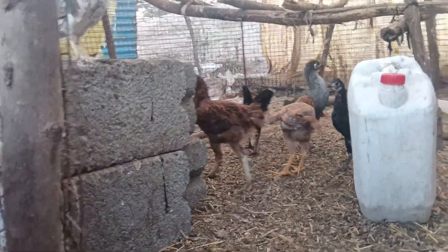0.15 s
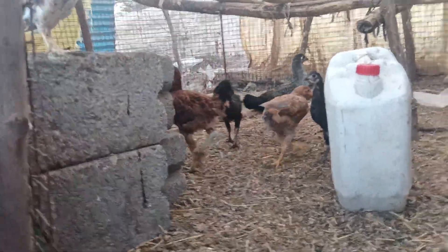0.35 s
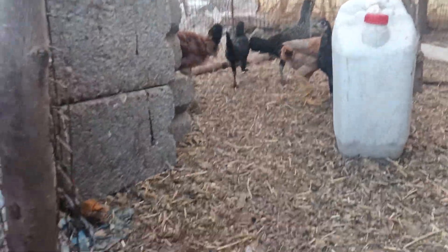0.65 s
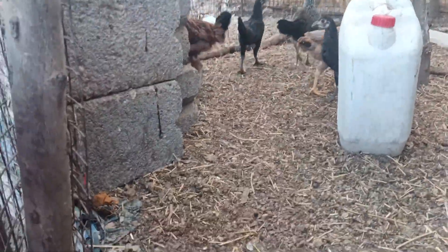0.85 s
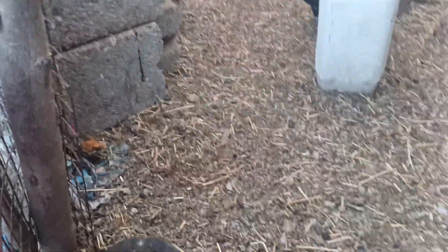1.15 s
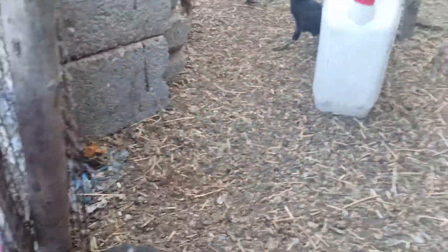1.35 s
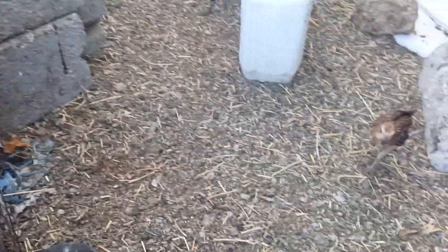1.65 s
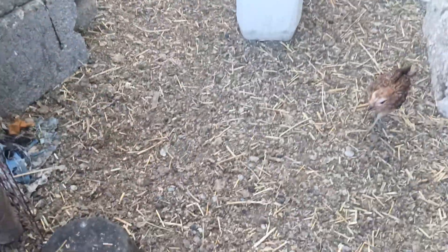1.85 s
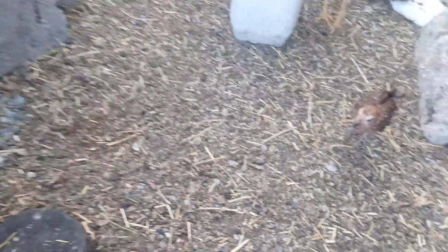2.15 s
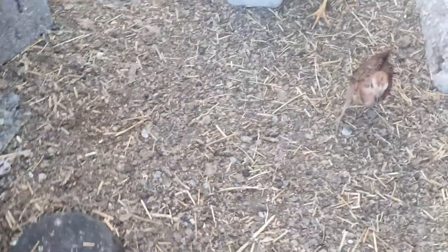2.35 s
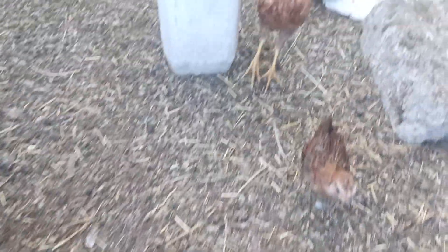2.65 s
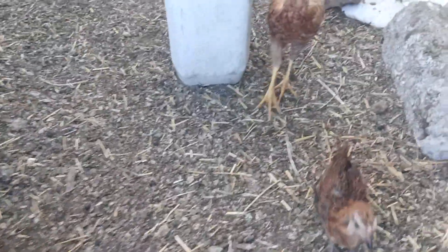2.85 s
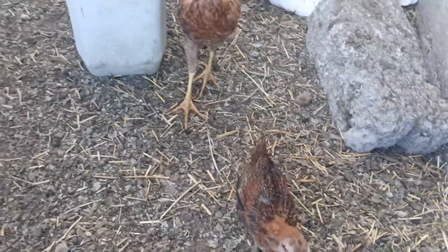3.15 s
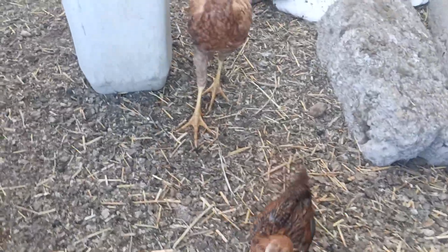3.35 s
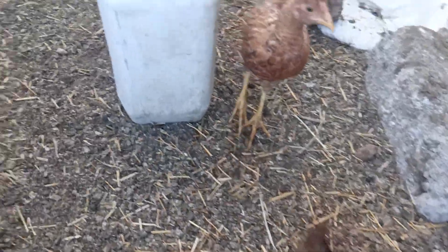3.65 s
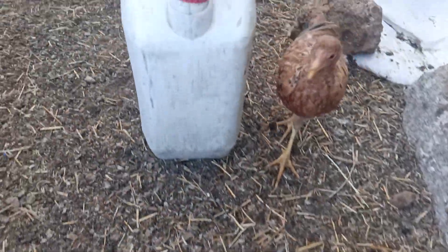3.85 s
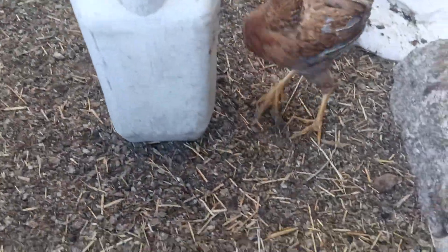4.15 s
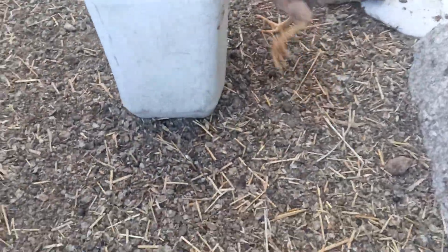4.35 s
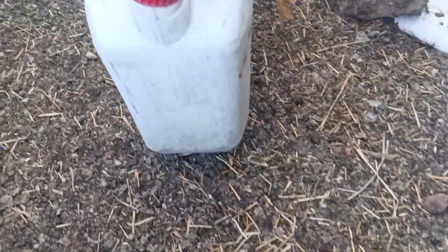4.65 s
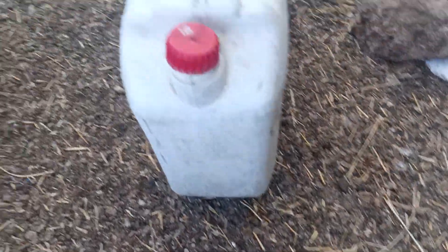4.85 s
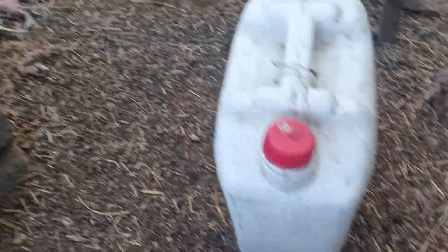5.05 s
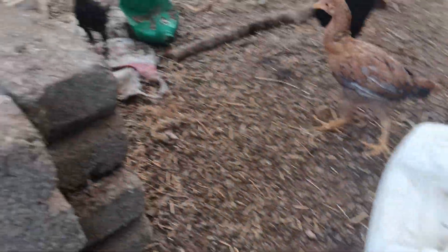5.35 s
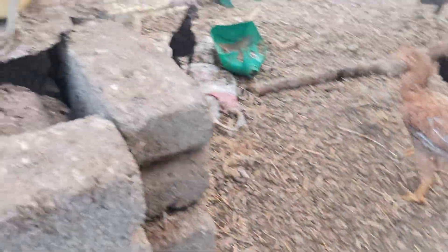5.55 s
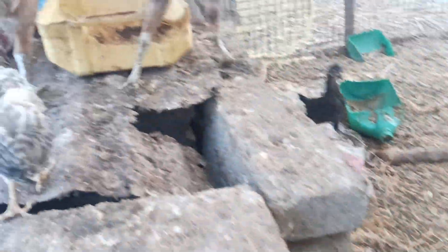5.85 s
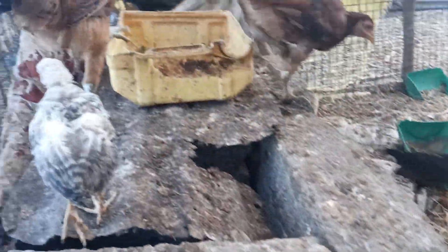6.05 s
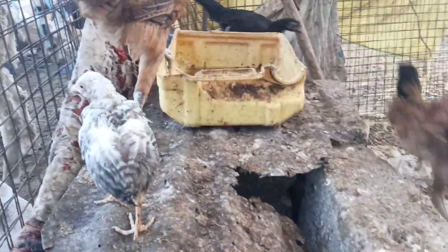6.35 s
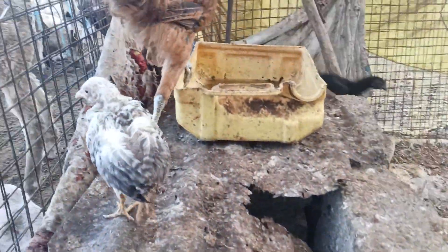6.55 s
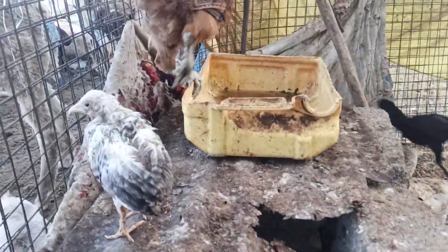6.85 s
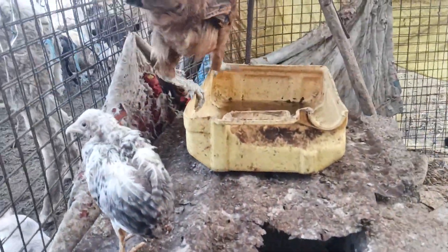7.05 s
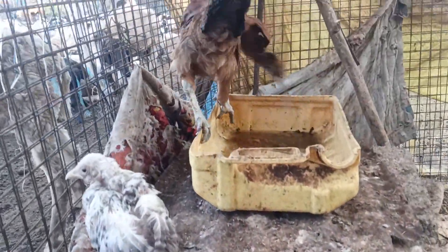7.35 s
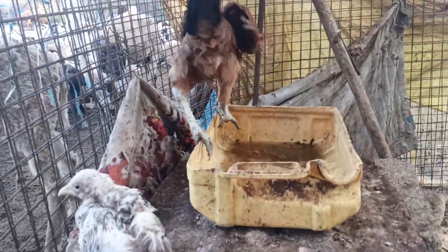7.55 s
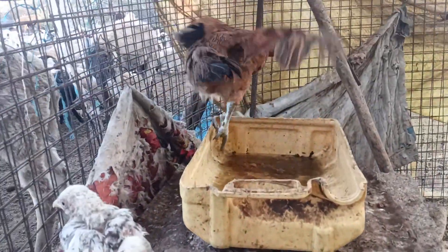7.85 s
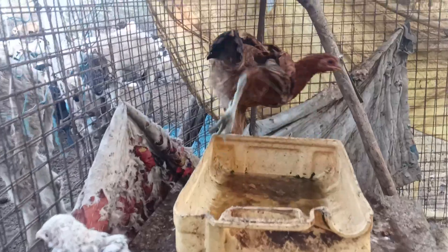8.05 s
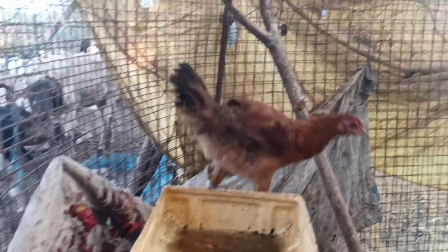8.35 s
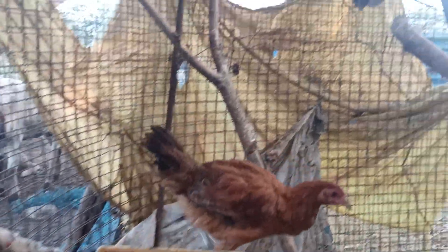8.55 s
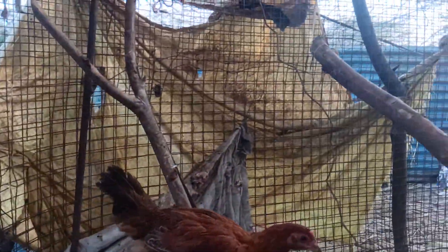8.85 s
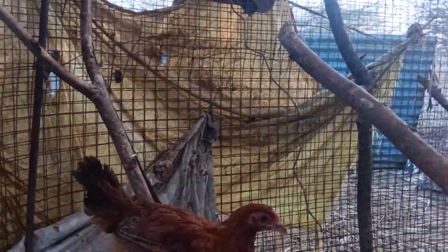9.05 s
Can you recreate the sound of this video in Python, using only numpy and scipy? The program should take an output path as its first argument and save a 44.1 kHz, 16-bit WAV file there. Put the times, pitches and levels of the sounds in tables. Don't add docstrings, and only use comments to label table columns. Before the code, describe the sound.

Chicks peep over quiet straw rustle in a coop; a lamb bleats close by, a ewe answers fainter, hens cluck and scuffle among knocks.

```python
import sys
import numpy as np
from scipy import signal
from scipy.fft import rfft, irfft, next_fast_len
from scipy.io import wavfile
from scipy.ndimage import uniform_filter1d, map_coordinates

SR = 44100
rng = np.random.default_rng(int(sys.argv[2]) if len(sys.argv) > 2 else 0)


def level_to_linear(level):
    exponent = np.asarray(level, float) / 20
    return 10 ** exponent


def wav_out(sig):
    wavfile.write(sys.argv[1], SR, np.round(np.clip(np.atleast_2d(sig).T, -1, 1) * 32767).astype(np.int16))


N = 405719
STEP = 32
CHIRP_HZ = 3550
FAR_EVERY_S = 0.393

# freq_hz, level_db
GROUND = [(18, -63.5), (30, -14), (103, 1), (166, -7), (240, -15), (400, -10), (520, -36), (880, -120)]
# freq_hz, level_db
SHUFFLE = [(120, -34.5), (200, -5), (577, -4), (660, 1.5), (2000, -22), (2600, -43), (4400, -120)]
# freq_hz, level_db
STRAW = [(710, -25), (1200, 1), (1860, 2), (2700, 5.5), (4380, -8), (5960, -10.5), (7500, -21.5),
         (9750, -49.5), (16500, -120)]
# freq_hz, level_db
CRACKLE = [(3240, -34.5), (5500, -1), (6630, 5.5), (7770, -8), (10400, -8.5), (11100, -2.5), (13600, -14),
           (15200, 6), (16300, -13), (16800, -47)]
# time_s, level_db
FLOCK = [(0, -76), (.47, -68), (1, -69), (1.2, -79), (1.5, -68), (1.65, -77), (2.1, -78), (2.2, -69),
         (2.5, -78), (2.75, -56), (3.74, -64.5), (4.4, -69), (5.2, -66), (5.85, -64), (6.03, -83),
         (8.9, -79), (9.2, -74)]
# peak_s, shuffle_db, straw_over_shuffle_db, rise_s, fall_s (both for 20 dB)
SCUFFLES = [
    (.61, -57, -4, .3, .14),
    (4.77, -42, -12, .16, .12),
    (4.98, -57, -2, .3, .07),
    (5.33, -48, -7, .06, .25),
    (5.8, -60, -8, 2, .25),
    (6.1, -72, 8, .07, .2),
    (6.35, -70, 2, .2, .06),
    (7, -70, 5, .2, .2),
    (8.05, -59.5, -12, .13, .2),
    (9.2, -67, -7, .5, .1),
]

# start_s, length_s, level_db
CHIRPS = [(0.05, 0.054, -56), (0.154, 0.031, -52.5), (0.297, 0.04, -55.5), (0.617, 0.065, -59.5),
          (0.754, 0.017, -52), (1.075, 0.044, -54.5), (1.489, 0.08, -66), (1.662, 0.045, -56.5),
          (1.806, 0.037, -56), (2.254, 0.049, -60.5), (2.419, 0.032, -56), (2.626, 0.058, -45),
          (3.815, 0.043, -58), (4.322, 0.041, -64.5), (4.86, 0.035, -57), (5.054, 0.031, -58.5),
          (5.215, .05, -65), (5.902, 0.03, -51), (6.08, 0.047, -61.5), (6.904, .13, -66)]
# start_s, length_s, pitch_hz, level_db
NOTES = [(0.486, 0.049, 2100, -59), (0.881, 0.027, 3600, -52.5), (0.916, 0.018, 2650, -55),
         (0.956, 0.012, 2355, -50.5), (0.966, 0.021, 1530, -58.5), (1.12, 0.024, 2940, -50),
         (1.563, 0.032, 1735, -63.5), (1.587, 0.014, 1277, -61), (1.745, .03, 2680, -62),
         (4.675, .035, 3000, -56), (3.988, 0.012, 3170, -42), (4.277, 0.017, 1276, -37),
         (4.922, 0.019, 1555, -46), (5.005, 0.022, 2960, -56.5), (5.377, 0.042, 3040, -42),
         (6.129, 0.019, 1490, -47), (6.303, 0.022, 2950, -61.5), (7.002, 0.035, 1170, -54.5),
         (7.847, 0.042, 2805, -64), (8.157, 0.064, 2500, -63), (9.158, 0.03, 3050, -57),
         (.143, .012, 3150, -58), (6.665, .015, 5350, -66), (8.012, .015, 5550, -66), (0, .04, 3250, -63),
           (.19, .03, 1300, -65), (.53, .02, 2300, -62), (1.085, .02, 2150, -61), (1.14, .04, 1450, -66),
           (1.418, .015, 2950, -57), (1.46, .02, 1800, -67), (1.53, .015, 2100, -64),
           (2.67, .03, 1600, -57), (3.98, .03, 1600, -63), (3.995, .025, 2550, -56),
           (4.235, .03, 2800, -55), (4.263, .025, 1800, -59), (4.272, .03, 2480, -54),
           (4.86, .03, 2550, -59), (4.91, .03, 2600, -60), (4.942, .012, 2150, -53),
           (5.385, .03, 3500, -52), (5.4, .015, 2550, -55), (5.437, .015, 2150, -55), (6.1, .03, 2400, -61),
           (7.53, .03, 2750, -70), (7.945, .03, 2350, -69), (8.165, .05, 3150, -71),
           (8.245, .04, 2050, -72), (8.54, .04, 2100, -68), (8.6, .03, 2750, -74), (8.795, .025, 2950, -71),
           (8.868, .045, 2050, -71), (8.993, .045, 1190, -55), (9.185, .012, 2450, -61)]
# start_s, length_s, start_hz, level_db
GLIDES = [(0.415, 0.1, 6200, -67), (1.355, .03, 2950, -61), (4.2, 0.04, 3450, -55), (4.198, .03, 2600, -52),
          (5.69, .04, 4050, -60), (5.74, .04, 3500, -57), (7.303, .03, 2850, -66), (7.33, .06, 3950, -71),
          (6.392, 0.08, 3900, -64), (6.68, 0.05, 5000, -60), (7.15, 0.112, 6350, -64),
          (8.015, 0.135, 5300, -61)]
# start_s, length_s, start_hz, end_hz, level_db
SHRIEK = (4.165, 0.024, 4500, 3650, -28)
# start_s, calls, level_db
FAR_PEEPS = [
    (.704, 5, -73.5),
    (.904, 1, -64.5),
    (3.84, 1, -68),
    (6.196, 8, -79),
]
# start_s, calls, level_db
HOOKS = [
    (.2, 5, -72),
    (6.1, 5, -76),
]

# start_s, length_s, pitch_hz, level_db, beak_opening_db
CLUCKS = [(1.875, .014, 590, -53, -6), (1.89, 0.036, 391.4, -55, -4), (1.983, .02, 745, -56, 3),
          (2.002, 0.043, 405, -51, -2.5), (3.998, 0.058, 361.6, -48, -8.5), (6.156, 0.05, 461, -58.5, -16),
          (7.143, 0.024, 347.6, -50.5, -22), (7.588, 0.071, 423.5, -48, -8),
          (8.399, 0.04, 340.4, -53.5, -17), (8.657, 0.021, 353.2, -51, -11), (8.74, 0.024, 415.7, -39, -4),
          (8.958, 0.035, 435, -55.5, -4.5), (9.088, 0.022, 418, -35, 1), (8.795, .03, 430, -58, -20),
          (9.11, .025, 410, -52, -6)]
# start_s, length_s, pitch_hz, level_db,
# beak_opening_db
GRUNTS = [(0.45, 0.13, 374, -57, 0.5), (0.167, 0.039, 435.7, -55.5, -3), (2.744, 0.05, 235.1, -46, -3),
          (5.897, 0.052, 235.3, -48, -3), (6.565, 0.05, 700, -60, -20), (7.046, 0.04, 365, -53.5, -28),
          (7.244, 0.035, 381.4, -49, -27), (7.435, 0.079, 385.5, -60, -20), (8, 0.04, 384.7, -49, -6),
          (8.118, 0.04, 402.2, -51, -3), (7.962, .035, 390, -57, -6), (8.765, .05, 400, -51, -5),
          (9.055, .035, 400, -50, -3)]
# freq_hz, width_hz, level_db
HEN_CHEST = [(414.6, 170, -1.5), (773, 178, 0)]
# freq_hz, width_hz, level_db
HEN_BEAK = [(1198, 350, -1), (1750, 570, -3), (2680, 290, -9.5), (4800, 2300, -25.5)]
# start_s, peak_db, ring_hz, snap_db
STAMPS = [(0.168, -61.5, 172, -11), (0.608, -50.5, 112, 5), (0.668, -45, 76.4, 4.5), (1.37, -60, 150, -30),
          (2.742, -45, 235, -3), (4.262, -52.5, 147, -39), (4.767, -38.5, 120, -14),
          (5.326, -38.5, 95, -31), (5.905, -55.5, 232.7, -22), (7.247, -51, 232, -11),
          (7.571, -42.5, 148.9, -8.5), (7.758, -47.5, 124, -17.5), (8.081, -42, 130, 6),
          (8.225, -59, 258.3, 23.5), (8.713, -40, 127, -2.5), (9.044, -44, 127, -7), (9.074, -47, 140, -12),
          (8.74, -48, 140, -20), (9.141, -47.5, 168, 0), (9.158, -48.5, 150, 0), (4.32, -58, 150, -30),
          (4.783, -44, 130, -5)]

# start_s, peak_db, body_db
TICKS = [(0.6069, -57, 12), (0.669, -60, 23), (1.66, -60, 5), (2.5172, -61.5, 16.5), (2.7, -56, 0),
         (2.886, -52, 0), (2.6513, -49.5, 3), (2.7478, -38, 3), (2.833, -45.5, 0.5), (3.9144, -31.5, -25),
         (4.4323, -51, 2), (4.724, -32.5, -9.5), (4.7738, -44.5, 10), (4.8369, -41.5, -22),
         (4.8814, -43.5, -1), (4.948, -34, -1.5), (5.0137, -50, -14.5), (5.3037, -26.5, -11.5),
         (5.372, -46, 4), (5.8868, -51.5, 11), (6.552, -52, -4), (6.744, -50.5, -7), (7.4452, -55, 5.5),
         (7.7163, -50, -15.5), (8.3421, -32.5, -6.5), (8.4395, -63.5, 17.5), (8.743, -59.5, 18)]
# freq_hz, level_db, t60_s (not used)
TIN = [(2033, -6.5, 0.11), (3700, -18.5, 0.075), (5520, -16.5, 0.035), (6196, -24, 0.08)]
# start_s, peak_db, ring_hz, t60_s
KNOCKS = [(1.878, -57, 1750, .03), (7.058, -56, 700, .05), (7.148, -51, 650, .04), (2.195, -60, 1250, .06),
          (4.462, -52, 2500, .02), (4.472, -50, 390, .05), (4.565, -54, 1100, .03), (4.738, -42, 700, .04),
          (4.776, -40, 1200, .02), (5.9, -42, 1000, .03), (5.935, -50, 1000, .03), (6.078, -55, 1300, .03),
          (6.093, -53, 1300, .03), (6.265, -58, 900, .06), (6.355, -55, 1300, .03), (7.253, -48, 850, .04),
          (7.443, -48, 650, .03), (7.475, -50, 700, .08), (7.995, -33, 1250, .02), (8.003, -40, 900, .04),
          (8.063, -54, 550, .04), (8.116, -33, 1750, .02), (8.66, -50, 900, .04), (9.048, -52, 650, .03)]
# start_s, peak_db
PINGS = [
    (4.572, -61),
    (4.667, -62),
    (4.745, -58),
    (4.837, -59),
    (4.951, -57),
    (5.303, -52),
    (5.424, -64),
]

# time_s, pitch_hz, effort_db, tongue_raised_db, tongue_hz
LAMB = [
    (2.94, 256, -35, 9, 2680),
    (2.984, 267, -27, 4, 2800),
    (3.045, 268.5, -26.5, 2.5, 2640),
    (3.12, 277, -25.5, 3, 2440),
    (3.268, 279, -25.5, 3.5, 2430),
    (3.3, 271, -27.5, 4, 2430),
    (3.52, 268, -30, -2, 2520),
    (3.69, 258, -41, -1, 2720),
    (3.755, 252, -55, -14, 2780),
]
# time_s, throat_hz, throat_db, cheek_db, brightness_db
LAMB_THROAT = [(2.95, 3100, 8, -16, 0), (3.1, 3300, 6, -18, -3), (3.26, 3200, 4, -16, -9),
               (3.33, 3450, 5, -14, -3), (3.46, 3450, 3, -8, 0), (3.55, 3000, -6, -2, -3),
               (3.7, 3700, 4, -9, 0)]
# freq_hz, width_hz, level_db
LAMB_UPPER = [(4230, 440, -1), (5400, 560, -9), (5900, 300, -28), (8900, 2400, -23), (14800, 2400, -25)]
# time_s, dip_hz
SLIPS = [
    (3.038, 3),
    (3.14, 2.2),
    (3.285, 3),
    (3.352, 6),
    (3.385, -3),
    (3.412, 4),
    (3.46, 3),
    (3.545, 4),
    (3.65, 4),
]
# freq_hz, lead_rad
LAMB_LEAD = [(0, 0), (690, -4.4), (3100, -13.9), (5170, -26.1), (11400, -53.3), (12900, -60.1),
             (14200, -56.3), (16600, -63.9)]

# start_s, every_s, clicks, level_db
PURR = (4.083, .0117, 9, -45)
# freq_hz, level_db, t60_s
PURR_THROAT = [(1020, -2, .017), (1350, -9, .012), (1750, 3, .02), (2400, -3, .01), (4400, -14, .008)]

# time_s, pitch_hz, mouth_db, throat_db
EWE = [
    (5.22, 280.5, -76.5, -89),
    (5.411, 316.2, -58, -55),
    (5.521, 292.6, -50.5, -46.5),
    (5.55, 231.3, -50.5, -48),
    (5.722, 224, -53, -46.5),
    (5.82, 226, -55, -52),
    (5.891, 222, -58, -100),
]
# freq_hz, width_hz, level_db
EWE_THROAT = [(1860, 220, 8), (2900, 400, -3), (3740, 500, -11), (6340, 400, -16)]

# freq_hz, left_minus_right_db
LEAN = [(60, -3), (150, -4), (380, 6), (950, 8), (2380, 0), (5980, 11), (15000, 5.5)]
# freq_hz, t60_s
COOP = [(200, 0.043), (2000, 0.069), (10000, 0.023)]


def unit(x):
    return x / np.sqrt(np.mean(x ** 2) + 1e-20)


def along(points, hz):
    f, v = np.transpose(points)
    return np.interp(np.log(hz + 1), np.log(f + 1), v)


def curves(rows, t):
    s, *cols = np.transpose(rows)
    return [np.interp(t, s, c) for c in cols]


def fine(x):
    part = np.arange(STEP) / STEP
    between = x[..., :-1, None] * (1 - part) + x[..., 1:, None] * part
    return between.reshape(*x.shape[:-1], -1)


def wobble(rate, size=N):
    knots = rng.standard_normal(int(size * rate / SR) + 4)
    return map_coordinates(knots, [np.arange(size) * rate / SR])


def filtered(x, response):
    m = next_fast_len(x.shape[-1] + 8192)
    spectrum = rfft(x, m) * response(np.fft.rfftfreq(m, 1 / SR))
    return irfft(spectrum, m)[..., :x.shape[-1]]


def peak(f, hz, width):
    return 1j * f * width / (hz * hz - f * f + 1j * f * width)


def tract(f, modes):
    return sum((-1) ** k * level_to_linear(db) * peak(f, hz, w) for k, (hz, w, db) in enumerate(modes))


def add(track, s, x):
    part = track[max(round(s * SR), 0):][:len(x)]
    part += x[:len(part)]


def voice(pitch, rough, throat, flutter_hz=220, clear_hz=2500, fray=1.5):
    size = len(pitch)
    k = np.arange(1, int(16500 / pitch.max()) + 1)[:, None]
    jitter = 1 + 0.033 * rough * wobble(70 * STEP, size=size)
    phase = 2 * np.pi * np.cumsum(fine(pitch * jitter)) / SR

    def slow(hz):
        noise = rng.standard_normal((len(k), size))
        return signal.resample(noise[:, :int(size * STEP * hz / SR) + 3], size, axis=1)

    flutter = slow(flutter_hz) + 1j * slow(flutter_hz)
    drift = level_to_linear(np.clip(k * pitch.mean() / 2200, 0, 2.5) * slow(18))
    rough = np.clip(rough * np.minimum(k * pitch / clear_hz, fray), 0, 1)
    overtones = throat(k * pitch) * drift * (1 - rough + rough * flutter)
    return np.real(np.sum(fine(overtones) * np.exp(1j * k * phase), 0))


def stir():
    t = np.arange(N // STEP + 2) * STEP / SR
    busy_db, = curves(FLOCK, t)
    calm_db = busy_db - np.median(busy_db)
    levels = level_to_linear([-80 + 0.55 * calm_db, busy_db, -88 + 0.4 * calm_db]) ** 2
    for s, db, straw_db, rise, fall in SCUFFLES:
        away_db = 20 * np.where(t < s, (s - t) / rise, (t - s) / fall)
        crackle_db = -69 + 0.9 * (2 * db + straw_db + 116)
        peaks_db = np.array([db, db + straw_db, crackle_db])
        levels += level_to_linear(peaks_db[:, None] - away_db * [[1], [0.7], [1.9]]) ** 2
    return fine(10 * np.log10(levels))[:, :N]


def rustle(spectrum, grains_db, alike):
    size = N // STEP + 2
    grains = wobble(220 * STEP, size=size) + 0.94 * wobble(25 * STEP, size=size)
    noise = rng.standard_normal((2, N)) * fine(level_to_linear(grains_db * grains))[:N]
    z = signal.stft(noise, nperseg=512)[2]
    field = uniform_filter1d(uniform_filter1d(rng.standard_normal(z.shape[1:]), 5, 0), 8, 1)
    patchy = signal.istft(z * level_to_linear(2.2 * unit(field)), nperseg=512)[1][:, :N]
    a, b = filtered(patchy, lambda f: level_to_linear(along(spectrum, f)))
    turn = np.arccos(np.clip(alike, 0, 1)) / 2
    left = np.cos(turn) * a + np.sin(turn) * b
    right = np.cos(turn) * a - np.sin(turn) * b
    return unit(np.array([np.roll(left, 26), right]))


def litter():
    shuffle_db, straw_db, crackle_db = stir()
    ground = (level_to_linear(-79) + level_to_linear(shuffle_db - 5)) * rustle(GROUND, grains_db=-3.0, alike=0.29)
    feet = level_to_linear(shuffle_db + 2) * rustle(SHUFFLE, grains_db=2.5, alike=0.54)
    straw = level_to_linear(straw_db + 2.2) * rustle(STRAW, grains_db=3.5, alike=0.26)
    crackle = level_to_linear(crackle_db + 4.0) * rustle(CRACKLE, grains_db=4, alike=0.12)
    return ground + feet + straw + crackle


def calls():
    sag, glide_hz_per_s = 0.03, 17500
    chirps = [(s, length, CHIRP_HZ, 2520, db) for s, length, db in CHIRPS]
    notes = [(s, length, hz * (1 + sag / 2), hz * (1 - sag / 2), db) for s, length, hz, db in NOTES]
    glides = [(s, length, hz, hz - glide_hz_per_s * length, db) for s, length, hz, db in GLIDES]
    return chirps + notes + glides + [SHRIEK]


def peep(length, start_hz, end_hz, bend, hooked=False):
    u = np.linspace(0, 1, round(length * SR))
    if hooked:
        fall = 1 / (1 + np.exp(8 * (u - 0.5)))
    elif length < 0.09:
        fall = np.cos(np.pi / 2 * u) ** bend
    else:
        fall = (1 - u) ** (bend if start_hz - end_hz > 2600 else 1.05)
    over_db = -34 if hooked else -41 if start_hz > 1400 else -24
    pitch = (end_hz + (start_hz - end_hz) * fall) * (1 + 0.014 * wobble(130, size=len(u)))
    phase = 2 * np.pi * np.cumsum(pitch) / SR
    whistle = np.sin(phase) + level_to_linear(over_db) * (np.sin(2 * phase) + 0.7 * np.sin(3 * phase))
    breath = np.sin(np.pi * u ** 1.4) ** 0.47
    return whistle * breath * level_to_linear(2.6 * wobble(147.6, size=len(u)))


def chicks():
    near, far = np.zeros((2, N))
    for s, length, start_hz, end_hz, db in calls():
        call = level_to_linear(db) * peep(length + 0.008, start_hz, end_hz, bend=1.6, hooked=start_hz == CHIRP_HZ)
        for late_s, loss_db in [(-0.005, 0.5), (0.006, -9), (0.017, -15)]:
            add(near, s + late_s, level_to_linear(loss_db) * call)
    for s, count, db in FAR_PEEPS:
        for k in range(round(count)):
            add(far, s + k * FAR_EVERY_S, level_to_linear(db + 0.5) * peep(0.105, 6300, 3300, bend=1.8))
    for s, count, db in HOOKS:
        for k in range(round(count)):
            add(far, s + k * FAR_EVERY_S, level_to_linear(db) * peep(0.04, 2300, 5300, bend=40))
    return near, far


def hens():
    out = np.zeros(N)
    clucks = [(*c, 0.17) for c in CLUCKS]
    grunts = [(*g, 0.8) for g in GRUNTS]
    for s, length, hz, db, open_db, rough in clucks + grunts:
        u = np.linspace(0, 1, round((length + 0.008) * SR / STEP))

        def throat(f):
            lean = level_to_linear(0.8 * (db + 43) * (f > 600))
            chest = tract(f, HEN_CHEST) * peak(f, 400, 600) * lean
            beak = tract(f, HEN_BEAK) * peak(f, 1900, 2700) / (1 + (f / 6500) ** 4)
            return chest + level_to_linear(open_db) * beak

        puff = np.sin(np.pi * u ** (0.9 - 0.6 * rough)) ** (0.6 + 1.5 * rough)
        puff = puff * level_to_linear((1.5 + 3.5 * rough) * wobble(90 * STEP, size=len(u)))
        pitch = hz * (1.02 - 0.051 * u)
        cluck = fine(puff) * voice(pitch, rough, throat, flutter_hz=440, clear_hz=579, fray=2.5)
        add(out, s - 0.003, level_to_linear(db - 4.0) * np.hypot(1, level_to_linear(open_db)) * unit(cluck))
    return out


def stamps():
    out, t = np.zeros(N), np.arange(SR // 10) / SR
    for s, db, hz, snap_db in STAMPS:
        ring = level_to_linear(-60 * t / 0.042) * np.sin(2 * np.pi * hz * t) * (1 - np.exp(-t / 0.0032))
        snap = level_to_linear(-60 * t / 0.012) * np.sin(2 * np.pi * 520 * t) * (1 - np.exp(-t / 0.0003))
        add(out, s + 0.004, level_to_linear(db + 12.5) * (ring + level_to_linear(snap_db + 1.5) * snap))
    return out


def ticks():
    out, t = np.zeros(N), np.arange(SR // 8) / SR
    fade = (level_to_linear(-60 * t / 0.025) + level_to_linear(-13 - 60 * t / 0.11)) * (1 - np.exp(-t / 0.0004))

    def vessel(f):
        modes = sum(level_to_linear(db + 16.5) * peak(f, hz, 450) for hz, db, _ in TIN)
        return peak(f, 2100, 1700) + modes * (f < 7000)

    for s, db, body_db in TICKS:
        crack, body = rng.standard_normal((2, len(t)))
        crack = unit(filtered(crack, lambda f: level_to_linear(along(CRACKLE, f))))
        body = unit(filtered(body, vessel))
        add(out, s, level_to_linear(db - 10.5) * fade * (crack + level_to_linear(body_db + 4.5) * body))
    return out


def knocks():
    out, t = np.zeros(N), np.arange(SR // 10) / SR
    modes = [(1, 0), (0.62, -7), (1.3, -5), (1.8, -11)]
    for s, db, hz, t60 in KNOCKS:
        ring = sum(level_to_linear(d + rng.normal(0, 2)) * np.sin(2 * np.pi * hz * r * t) for r, d in modes)
        crack = unit(filtered(rng.standard_normal(len(t)), lambda f: peak(f, 1.3 * hz, 1.5 * hz) ** 3))
        add(out, s, level_to_linear(db + 4 - 60 * t / t60) * (ring + 0.4 * crack) * (1 - np.exp(-t / 0.0012)))
    return out


def lamb():
    hum_s = 2.835
    t = np.arange(hum_s, LAMB[-1][0], STEP / SR)
    pitch, mouth_db, raised_db, tongue_hz = curves(LAMB, t)
    throat_hz, throat_db, cheek_db, bright_db = curves(LAMB_THROAT, t)

    early = np.maximum(LAMB[0][0] - t, 0)
    slip_hz = sum(hz * np.exp(-((t - s) / 0.009) ** 2) for s, hz in SLIPS)
    crack_hz = 14 / (1 + np.exp((3.65 - t) / 0.004))
    pitch = pitch - crack_hz - 160 * early - slip_hz
    pitch = pitch * (1 + 0.002 * wobble(30 * STEP, size=len(t)))

    mouth_db = mouth_db - np.minimum(400 * early, 24)
    below_db = mouth_db - mouth_db.max()
    nose_db = -51 - 24 * (t - hum_s)
    tongue_db = mouth_db + raised_db
    upper_db = mouth_db.max() - 6 + 1.3 * below_db + 0.6 * np.clip(raised_db, -9, 9)
    hush_db = np.clip(200 * (t - 3.39), 0, 14)
    rough = np.interp(t, [2.9, 2.95, 3.26, 3.3, 3.4, 3.48], [0.2, 0.08, 0.06, 0.17, 0.22, 0.1])
    rough = rough + 0.026 * abs(slip_hz)
    shake = level_to_linear(6 * rough * wobble(40 * STEP, size=len(t)))
    jaw = level_to_linear(9 * np.clip((2.945 - t) / 0.03, 0, 1) * (t > 2.921))

    def mouth(f):
        cavity = peak(f, 1110, 310) ** 2 + level_to_linear(-13) * peak(f, 1600, 750) ** 2
        return level_to_linear(mouth_db + 3) * (cavity - level_to_linear(cheek_db) * peak(f, 1345, 200))

    def tongue(f):
        return level_to_linear(tongue_db + 1.5) * peak(f, tongue_hz, 430) ** 2

    def upper(f):
        tilt_db = below_db * np.clip(f / 5500 - 1, 0, 2)
        level_db = upper_db + tilt_db - hush_db * (f > 7000) + bright_db * (abs(f - 5900) < 900)
        throat = level_to_linear(throat_db) * peak(f, throat_hz, 650) ** 2
        shorter = f * np.sqrt(272 / pitch)
        tops = sum((-1) ** k * level_to_linear(db) * peak(shorter, hz, w) ** 2 for k, (hz, w, db) in enumerate(LAMB_UPPER))
        return level_to_linear(level_db) * (throat - tops) * (f / 3000) ** 4 / (1 + (f / 3000) ** 4)

    def head(f):
        nose = level_to_linear(nose_db + 5.5) * (f < 1.5 * pitch)
        notch = 1 - 0.96 * peak(f, 6750, 700)
        opened = jaw * (mouth(f) - tongue(f) + upper(f)) * notch
        return shake * signal.windows.tukey(len(t), 0.03) * (nose + opened)

    out = np.zeros(N)
    add(out, t[0], -voice(pitch, rough, head))
    return out


def purr():
    out, t = np.zeros(N), np.arange(SR // 10) / SR
    s, every, count, db = PURR
    for k in range(round(count)):
        click = sum(level_to_linear(d + rng.normal(0, 2.5) - 60 * t / t60) * np.sin(2 * np.pi * hz * t)
                    for hz, d, t60 in PURR_THROAT)
        first_db = -6 * (k == 0)
        add(out, s + every * (k + rng.normal(0, 0.06)), level_to_linear(db + first_db) * click)
    return out


def pings():
    out, t = np.zeros(N), np.arange(SR // 8) / SR
    for s, db in PINGS:
        level_db = db + 2 * wobble(150, size=len(t)) - 60 * t / 0.05
        hz = 11250 * (1 + rng.normal(0, 0.004))
        add(out, s, level_to_linear(level_db) * np.sin(2 * np.pi * hz * t) * (1 - np.exp(-t / 0.002)))
    return out


def ewe():
    t = np.arange(EWE[0][0], EWE[-1][0], STEP / SR)
    pitch, mouth_db, throat_db = curves(EWE, t)
    shake = 0.18
    for k in range(7):
        s, db = 5.518 + 0.0452 * k, -42.5 + rng.normal(0, 1.5)
        shake = shake + level_to_linear(db + 36.5) * np.exp(-((t - s - 0.018) / 0.016) ** 4)

    def mouth(f):
        cavity = peak(f, 890, 170) ** 2 + level_to_linear(-22) * peak(f, 450, 100) ** 2
        closed = level_to_linear(0.1) * (f < 1.5 * pitch) * (t < 5.46)
        return level_to_linear(mouth_db + 12) * np.sqrt(shake + 0.3) * (cavity + closed)

    def throat(f):
        modes = sum(level_to_linear(db) * peak(f, hz, 1.5 * w) ** 2 for hz, w, db in EWE_THROAT)
        return level_to_linear(throat_db + 3) * shake * modes

    def head(f):
        return (mouth(f) - throat(f)) * signal.windows.tukey(len(t), 0.1)

    out = np.zeros(N)
    add(out, t[0], voice(pitch, 0.52, head))
    return out


def ports(x, lag_s, lean=1, lead=((0, 0),)):
    side = np.array([[1], [-1]])

    def response(f):
        colour = level_to_linear(side * lean * along(LEAN, f) / 2)
        turn = np.interp(f, *np.transpose(lead)) / 2 - np.pi * f * lag_s
        return colour * np.exp(1j * side * turn)

    return filtered(x, response)


def coop(x):
    _, t, z = signal.stft(rng.standard_normal((2, SR // 3)), SR, nperseg=256)
    hz = np.fft.rfftfreq(256, 1 / SR)
    tail = signal.istft(z * level_to_linear(-60 * t / along(COOP, hz)[:, None]), SR, nperseg=256)[1]
    delayed = np.pad(x, (150, 0))[None]
    return signal.fftconvolve(delayed, tail / np.linalg.norm(tail[0]), axes=1)[:, :N]


def scene():
    bed = litter()
    near, far = chicks()
    hen, tick = hens() + knocks() + purr(), ticks() + pings()
    kid, mother = lamb(), ewe()
    direct = ports(kid + tick, 0, lead=LAMB_LEAD)
    direct += ports(mother + near + far, 0.00055, lean=0.8)
    direct += ports(hen + stamps(), 0.00094, lean=0.68)
    wet = level_to_linear(-14) * kid + level_to_linear(-11) * mother + level_to_linear(0.7) * near
    wet += level_to_linear(-3) * far + level_to_linear(-6.5) * hen + level_to_linear(-4) * tick
    return direct + coop(wet) + bed


def band_limit(x):
    return signal.sosfilt(signal.butter(12, 17010, fs=SR, output="sos"), x)


def record(dry):
    mix = filtered(dry, lambda f: (1j * f / 60) ** 2 / (1 + 1j * f / 60) ** 2)
    return band_limit(mix)


dry = scene()
out = record(dry)
wav_out(out)
```